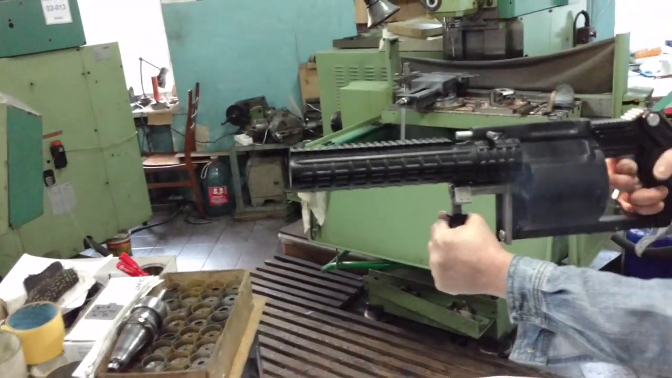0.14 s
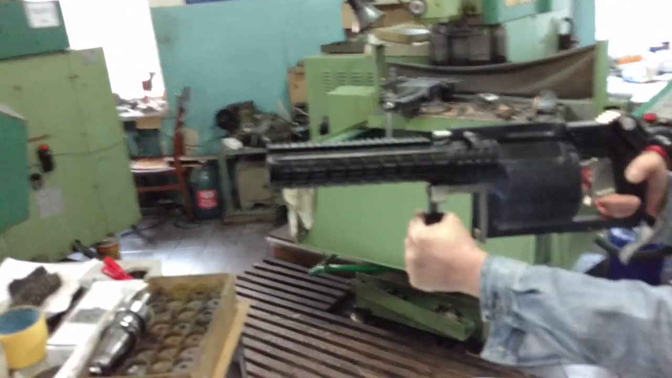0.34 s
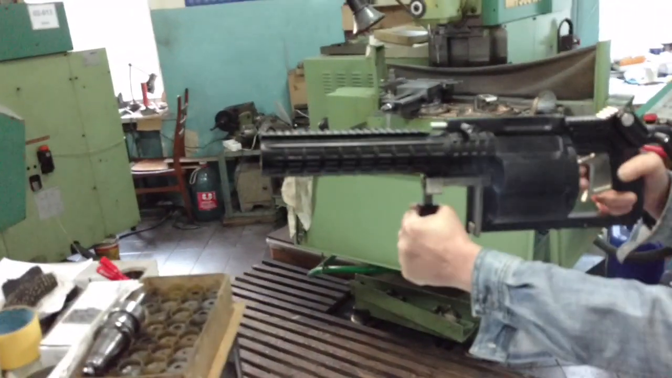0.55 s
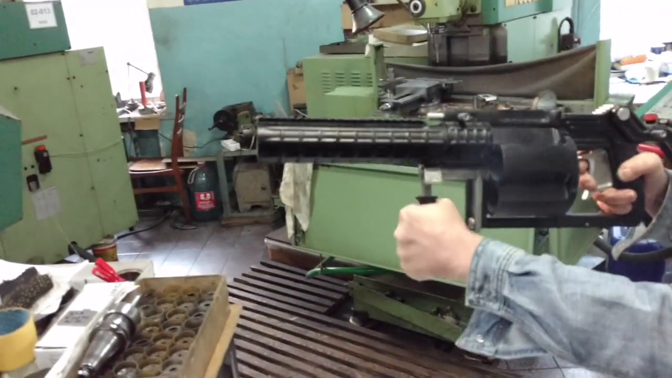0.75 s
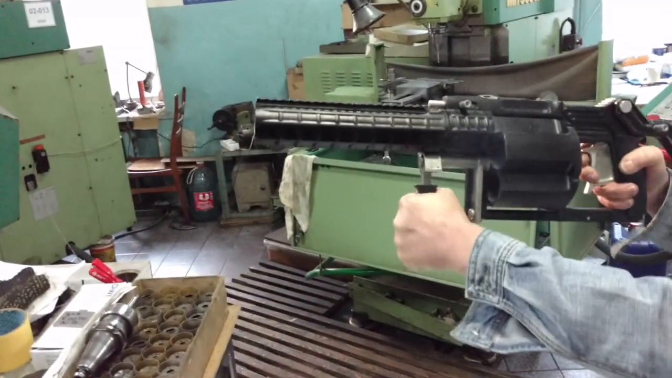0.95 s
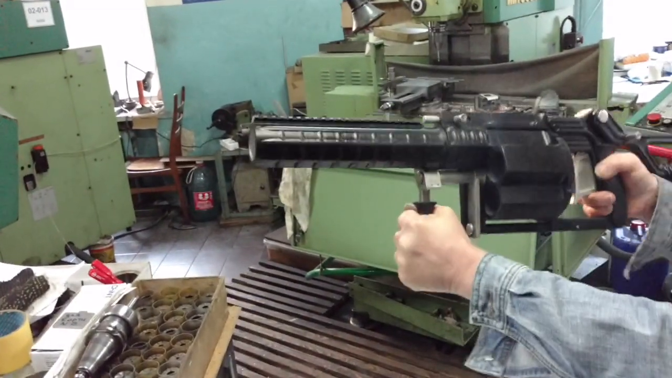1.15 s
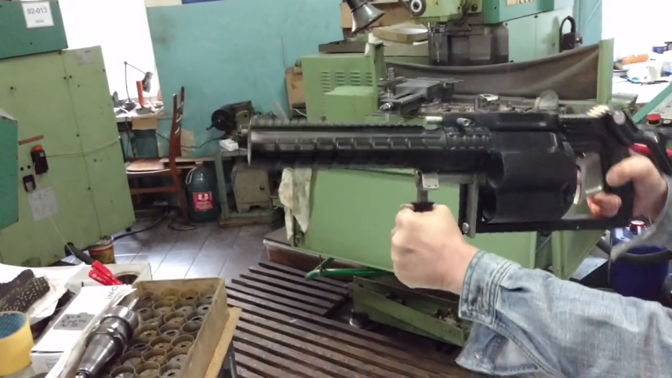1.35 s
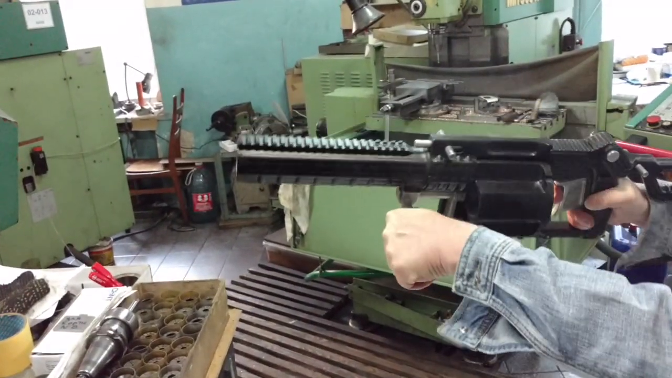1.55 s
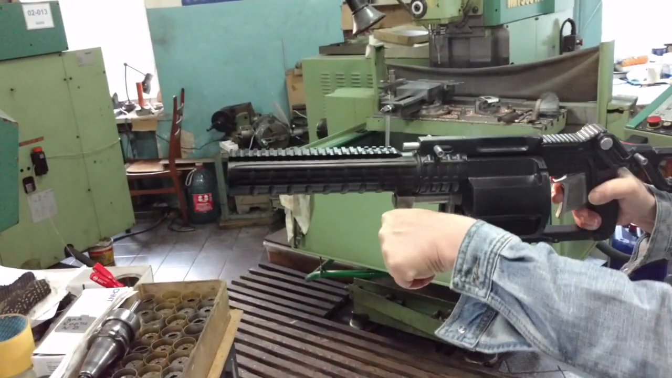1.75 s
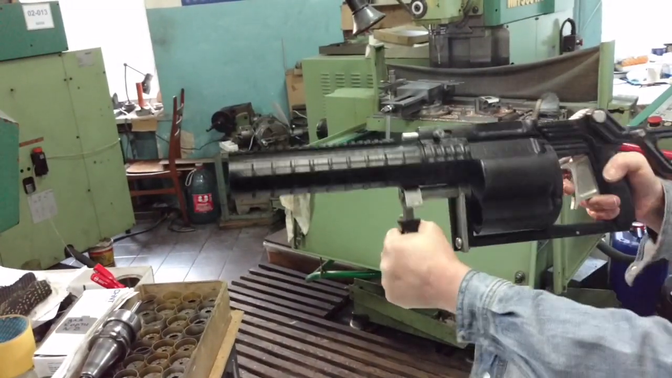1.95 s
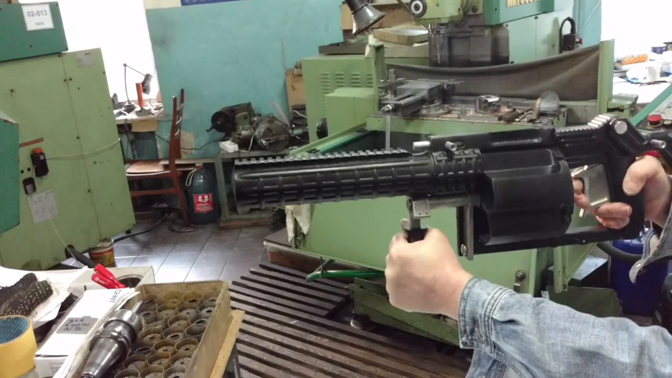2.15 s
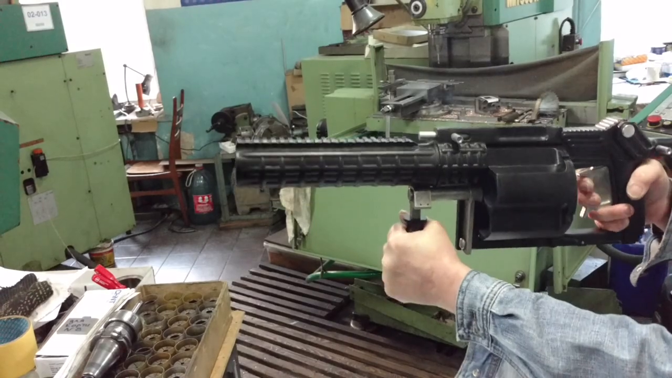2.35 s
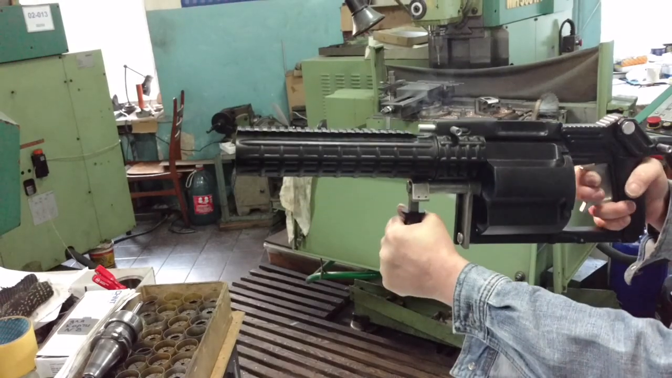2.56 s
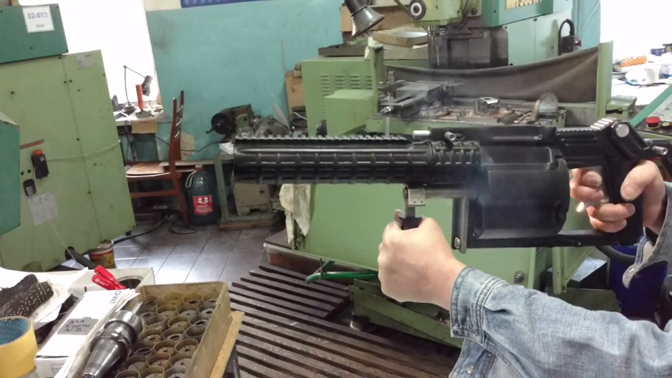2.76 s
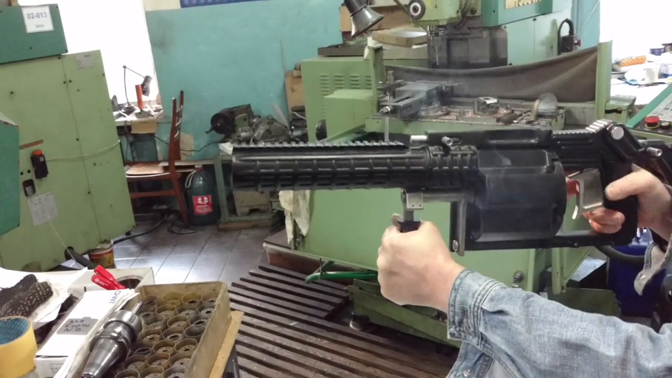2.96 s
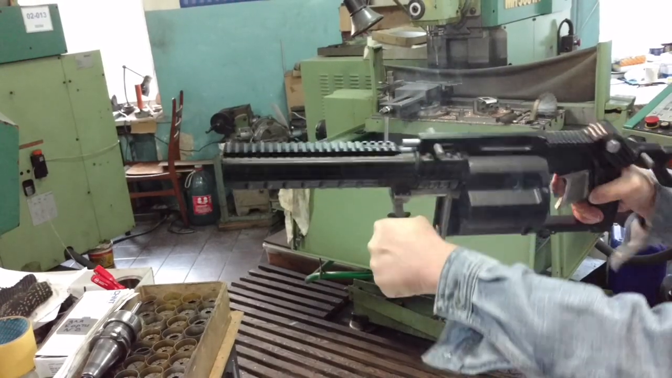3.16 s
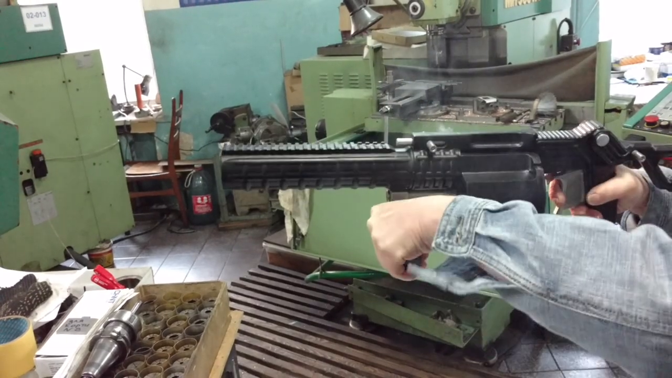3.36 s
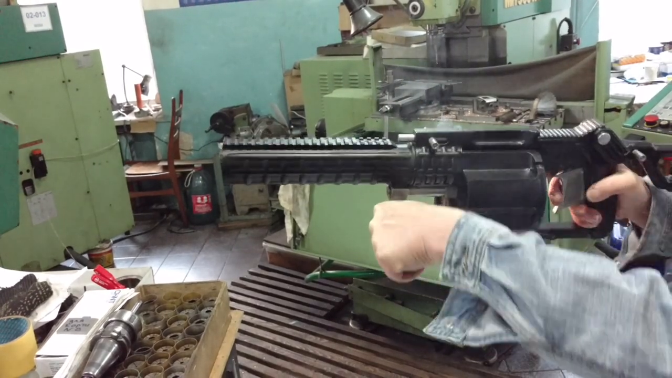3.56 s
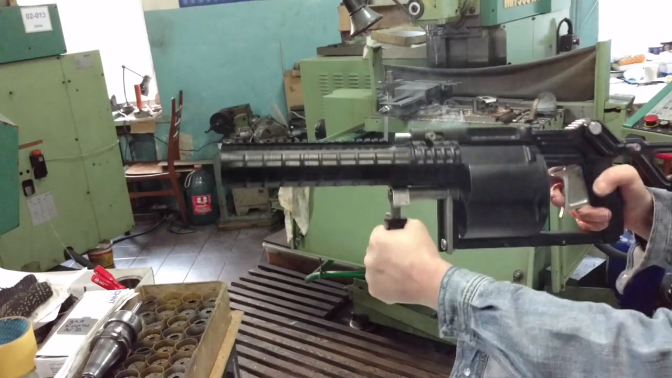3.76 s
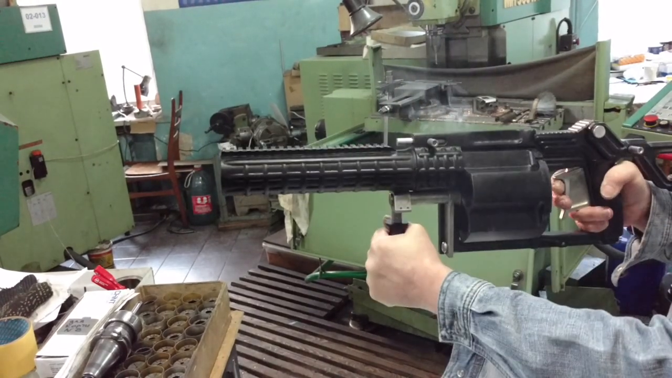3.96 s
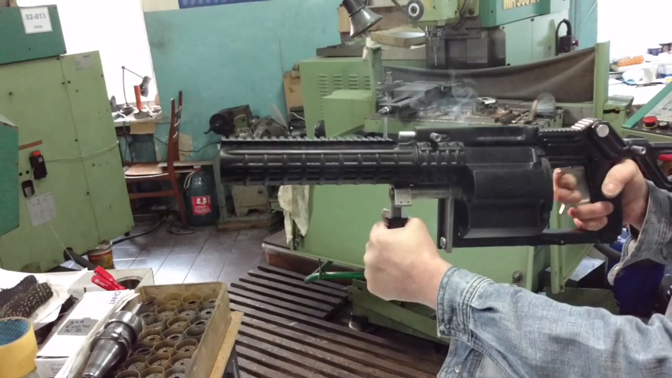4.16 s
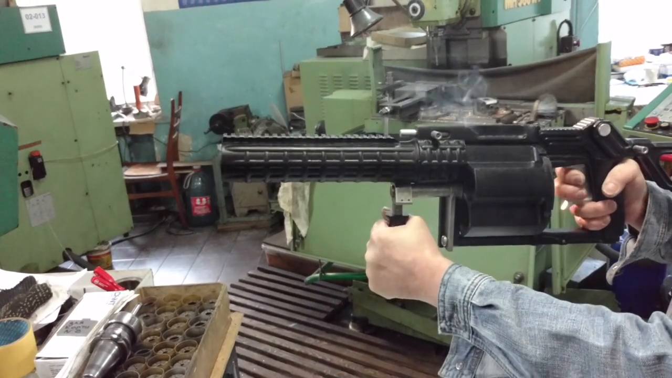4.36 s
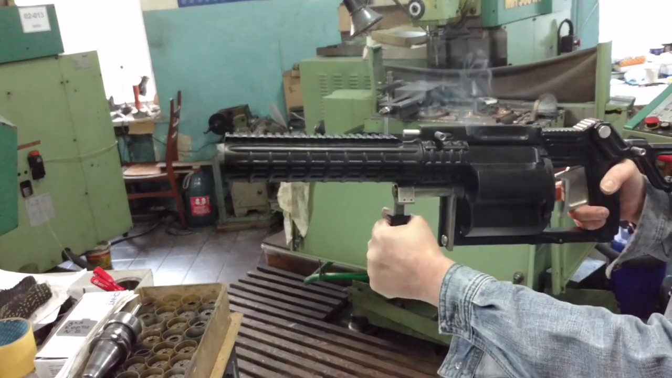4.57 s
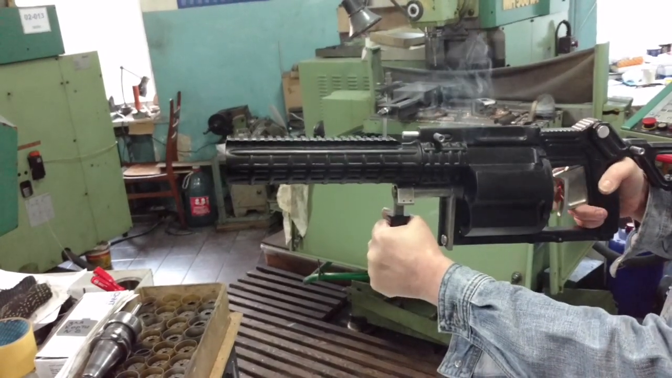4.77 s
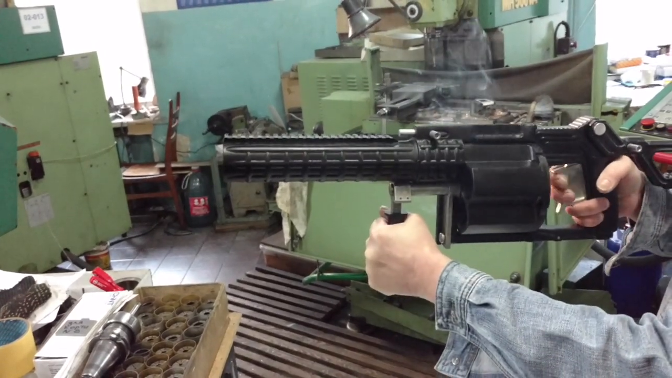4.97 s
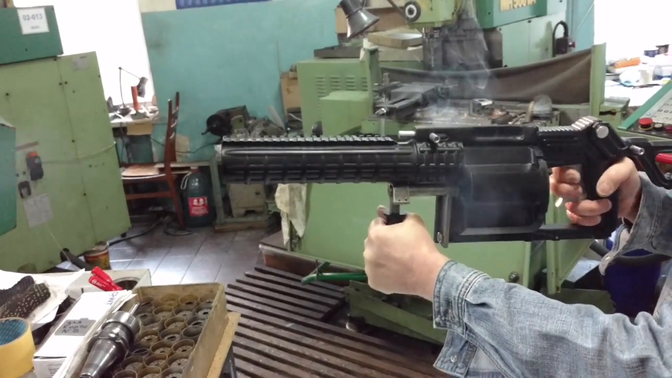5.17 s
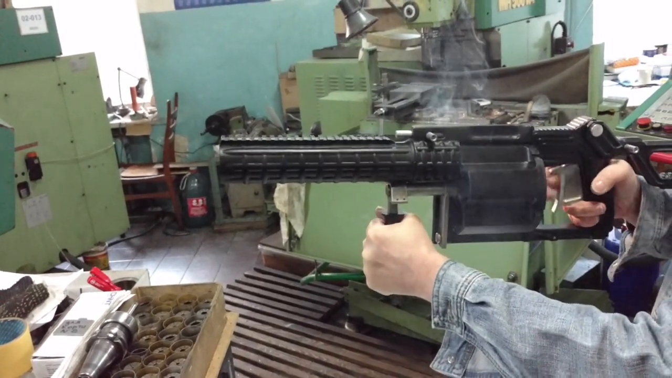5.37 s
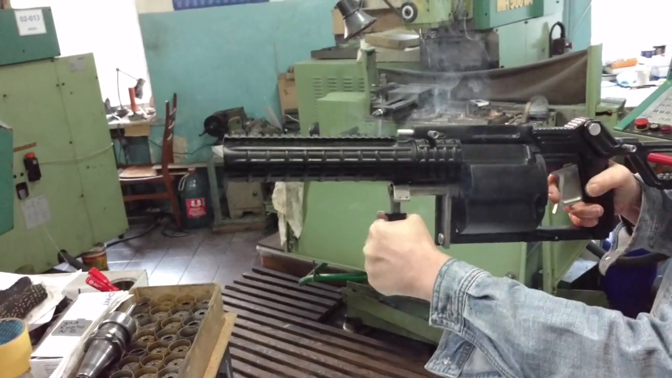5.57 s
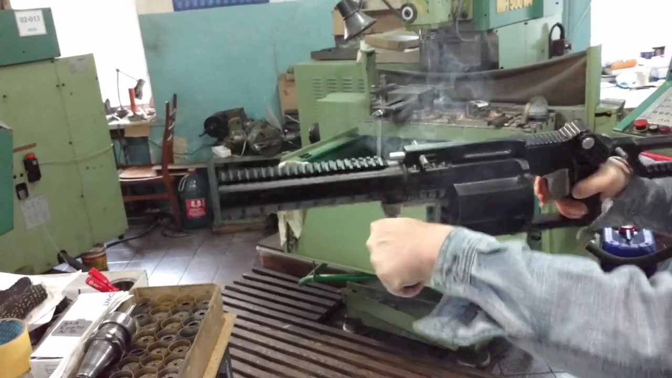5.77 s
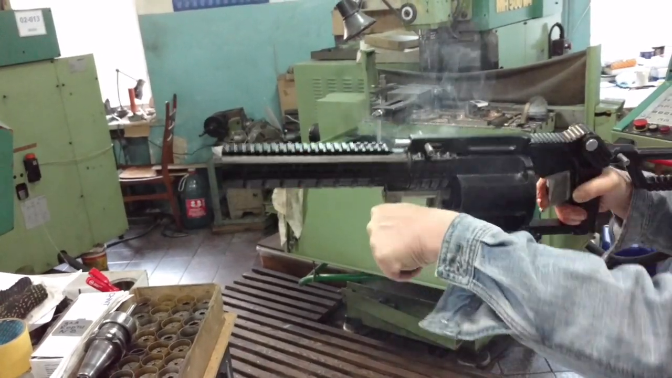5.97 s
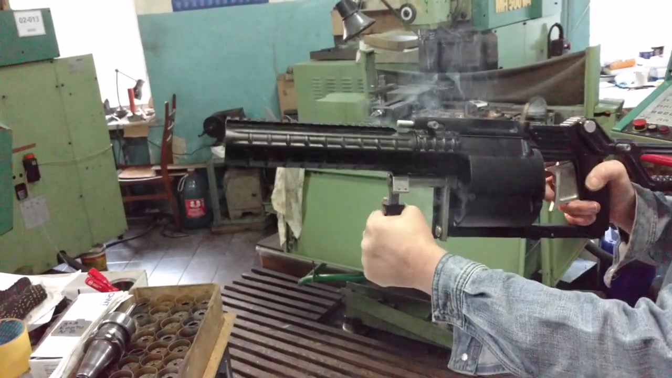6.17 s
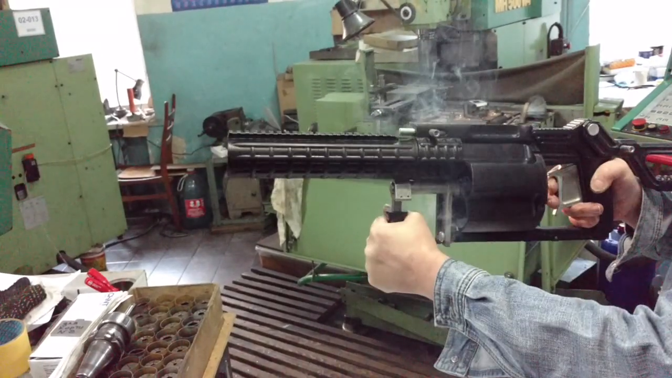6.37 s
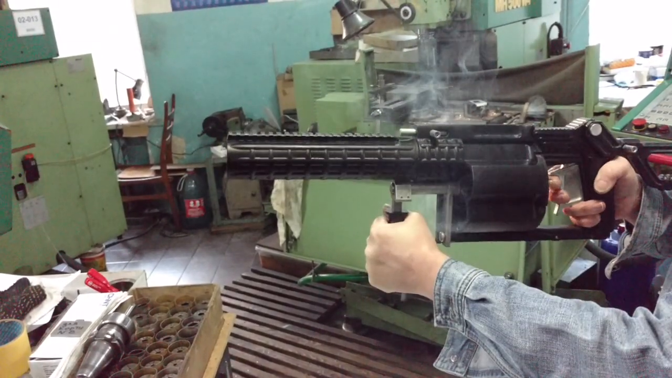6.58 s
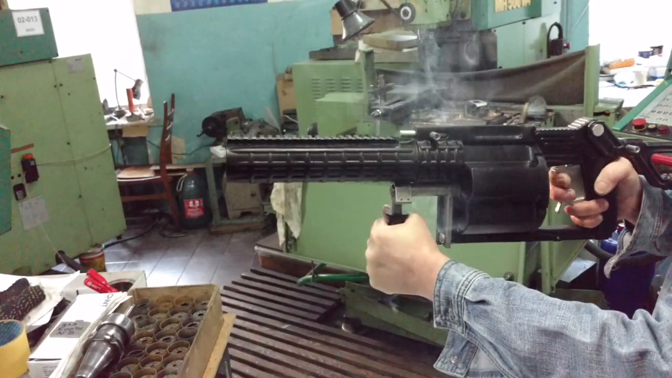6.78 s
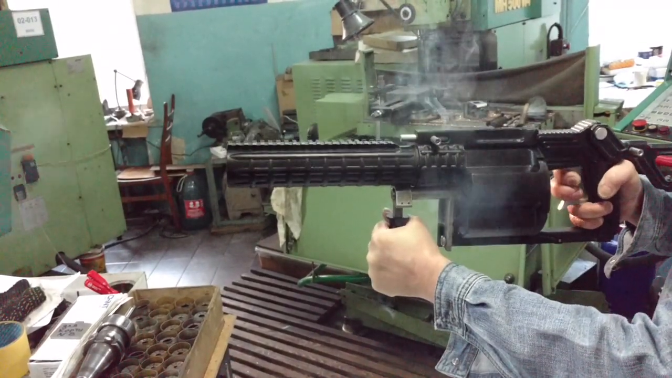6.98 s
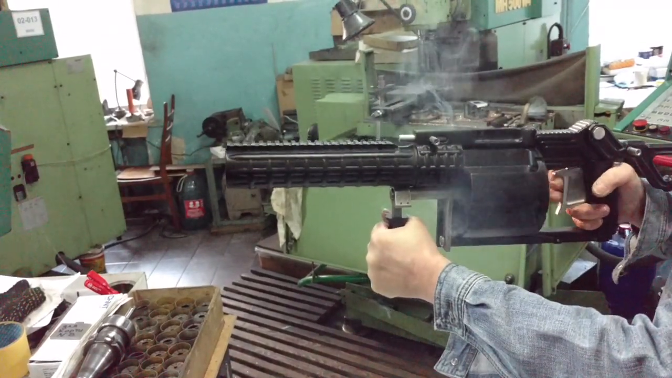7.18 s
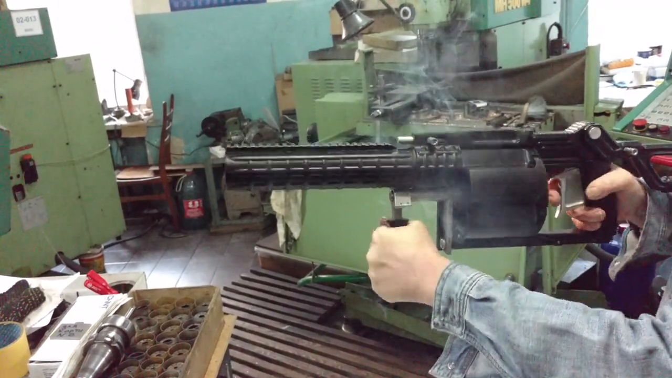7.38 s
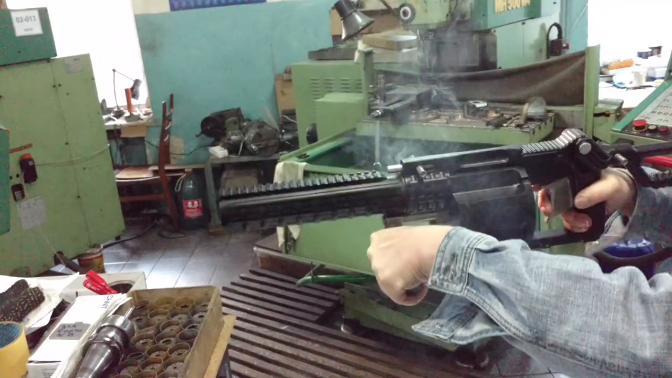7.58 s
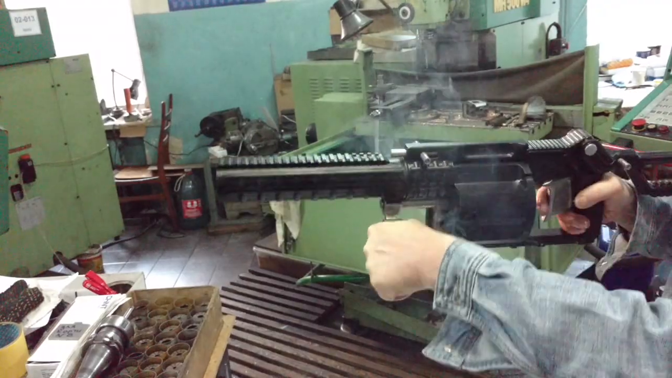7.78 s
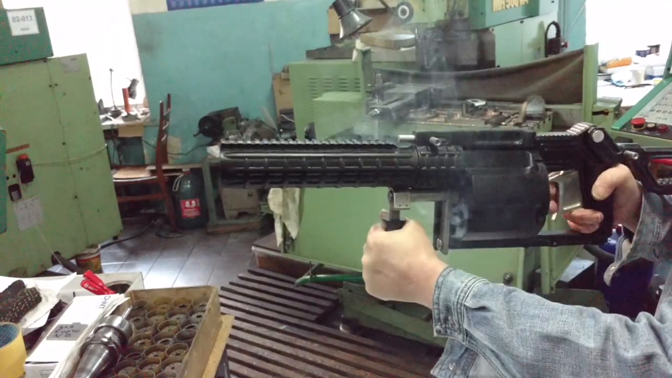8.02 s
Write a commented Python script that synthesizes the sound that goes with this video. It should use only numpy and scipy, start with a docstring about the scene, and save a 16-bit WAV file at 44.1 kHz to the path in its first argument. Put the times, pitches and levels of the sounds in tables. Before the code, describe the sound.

Close to the microphone in a hard-walled workshop, a hand-held revolving launcher fires four times. Each overloaded bang has a tiny crack just before it, a low push and a ringing tail under a second long. Between shots the cylinder and trigger click and clack sharply. An airy machine drone, hum and thin electric whine duck after each blast, then swell back.

```python
"""Revolver launcher in a machine shop

Four shots close to a camera: each a small crack, 4 ms later the blast, a low push, then the ringing hard room.
Cylinder and trigger click and clack as noise bursts and dying modes, over a noise drone, hum and electric whine.
The camera's gain control ducks at every blast and creeps back, so the shop seems to swell toward the next shot;
the blasts overload its input.
"""
import sys
import numpy as np
from scipy import signal
from scipy.fft import rfft, irfft
from scipy.io import wavfile
from scipy.ndimage import minimum_filter1d

SR = 44100
rng = np.random.default_rng(int(sys.argv[2]) if len(sys.argv) > 2 else 0)


def generate_wav(signal):
    """Clip the signal to [-1, 1] and save it as 16-bit WAV at the path in sys.argv[1]."""
    frames = np.transpose(np.atleast_2d(signal))
    scaled = np.clip(frames, -1, 1) * 32767
    pcm = np.round(scaled).astype(np.int16)
    wavfile.write(sys.argv[1], SR, pcm)


N = 355005
TIME = np.arange(N) / SR  # s


def amp(db):
    """Amplitude factor of a level in dB."""
    return 10 ** (np.asarray(db) / 20)


def evened(x):
    """Scales x to rms 1."""
    return x / np.sqrt(np.mean(x ** 2) + 1e-20)


def brief(x, seconds):
    """Scales x to the energy of a sound of rms 1 lasting the given time."""
    energy = np.mean(x ** 2) * x.shape[-1]
    return x * np.sqrt(seconds * SR / (energy + 1e-20))


def over_time(points):
    """Linear curve through (time, value) points, over the whole scene."""
    return np.interp(TIME, *np.transpose(points))


def read(points, hz):
    """Curve through (frequency, value) points, linear in log frequency."""
    f, value = np.transpose(points)
    return np.interp(np.log(hz + 1), np.log(f + 1), value)


def add(mix, start_s, sound):
    """Adds a sound into the mix in place, cut at the end of the mix."""
    part = mix[:, round(start_s * SR):][:, :sound.shape[-1]]
    part += sound[..., :part.shape[1]]


# likeness of left and right noise: (frequency [Hz], coherence [0-1])
LIKENESS = [(100, 0.96), (900, 0.98), (3000, 1), (8000, 0.97), (15000, 0.59)]


def noise(count):
    """White noise on two channels, nearly alike in the bass and less so in the treble."""
    left, other = rfft(rng.standard_normal((2, count)))
    same = np.clip(read(LIKENESS, np.fft.rfftfreq(count, 1 / SR)), 0, 1)
    right = same * left + np.sqrt(1 - same ** 2) * other
    return irfft(np.array([left, right]), count)


def coloured(x, spectrum, treble_db=0, size=4096):
    """Causal minimum-phase filter of unit energy; the treble lift acts above about 2 kHz."""
    hz = abs(np.fft.fftfreq(size, 1 / SR))
    log_gain = np.log(amp(read(spectrum, hz) + treble_db * hz / (hz + 2000)))
    response = np.exp(signal.hilbert(log_gain).conj())
    taps = np.fft.ifft(response).real[:size // 2]
    taps = taps / np.linalg.norm(taps)
    return signal.oaconvolve(x, taps[None], axes=1)[:, :x.shape[1]]


def burst(hold_s, fall_s, count=4096):
    """White noise that holds for a moment, then dies away exponentially."""
    t = np.arange(count) / SR
    return noise(count) * np.exp(-np.maximum(t - hold_s, 0) / fall_s)


def rung(modes, scatter):
    """Sum of dying modes, each detuned at random by a relative scatter."""
    t = np.arange(4096) / SR
    out = np.zeros(len(t))
    for hz, db, t60_s in modes:
        detuned_hz = hz * (1 + scatter * rng.standard_normal())
        out += amp(db - 60 * t / t60_s) * np.sin(2 * np.pi * detuned_hz * t)
    return out


def wander(rate_hz, count=2048):
    """Slow complex random signal of rms about 1, changing about rate_hz times a second."""
    white = rng.standard_normal(count) + 1j * rng.standard_normal(count)
    hz = np.fft.fftfreq(count, N / SR / count)
    slow = np.fft.ifft(np.fft.fft(white) * np.exp(-(hz / rate_hz) ** 2))
    return np.interp(TIME, np.linspace(0, N / SR, count), slow / np.std(slow))


# colour of the airy drone: (frequency [Hz], relative density [dB per Hz])
DRONE = [(30, -17), (90, -10), (170, -1.5), (300, -3.5), (400, -0.5), (560, -7.5), (820, -6.5),
         (1500, -10.5), (2500, -17), (3400, -13.5), (5000, -23), (8000, -23), (14000, -29)]
# pitch of the hum: (time [s], frequency [Hz])
HUM = [(0, 401.5), (2, 393), (4.9, 394.1), (5.1, 404), (5.25, 418), (6.4, 392), (8, 391)]


def drone(hiss_db=-2.0, hum_db=-6.5, octave_db=-16, hum_width_hz=10, hum_waver=.45):
    """Coloured noise with a gliding hum and its octave, both wavering at random."""
    turn = np.exp(2j * np.pi * np.cumsum(over_time(HUM)) / SR)
    out = amp(hiss_db) * coloured(noise(N), DRONE)
    for db, tone in [(hum_db, turn), (octave_db, turn ** 2)]:
        wavering = (1 + hum_waver * wander(hum_width_hz)) * tone
        out = out + amp(db) * evened(wavering.real)
    return out


# tones of the electric whine: (frequency [Hz], level relative to its level curve [dB])
WHINE = [(1669, -10.5), (1878, -5.5), (2087, 9.5), (3423, -27), (3962, -23), (6597, -18.5), (7009, -25.5),
         (7353, -24.5), (7429, -16.5), (7474, -21.5), (9173, -23.5), (10348, -22.5), (11272, -26)]


def whine(low_gain, high_gain, flutter=.35, flutter_hz=6, split_hz=3000):
    """Thin steady-pitched electric tones that flutter in level."""
    out = np.zeros(N)
    for hz, db in WHINE:
        gain = low_gain if hz < split_hz else high_gain
        tone = (1 + flutter * wander(flutter_hz).real) * np.cos(2 * np.pi * hz * TIME)
        out += gain * amp(db) * evened(tone)
    return out


# level of the drone, and of the whine from 3 kHz up: (time [s], level [dB])
DRONE_LEVEL = [(0, -42.5), (1.3, -40), (2, -41), (2.25, -47), (2.8, -46), (3.799, -43), (8.001, -41.5)]
# the low tones of the whine come and go: (time [s], level [dB])
WHINE_LEVEL = [(0, -44.5), (1.25, -44), (1.36, -45), (1.45, -43), (1.65, -49), (2, -42.5), (2.3, -52.5),
               (2.8, -56.5), (3.9, -73.5), (4.33, -65.5), (4.48, -52), (4.82, -49), (4.91, -57.5),
               (5.15, -43), (5.3, -46), (6.2, -71.5), (7.1, -59), (8, -69.5)]


def background():
    """Drone and whine; the high tones of the whine follow the drone's level."""
    low_gain, high_gain = amp(over_time(WHINE_LEVEL)), amp(over_time(DRONE_LEVEL))
    return high_gain * drone() + whine(low_gain, high_gain)


# soft bumps of handling: (time [s], level [dB])
BUMPS = [(1.155, -22.5), (3.605, -23.5), (4.691, -45), (4.954, -33)]


def bumps(hz=150, width_s=0.0031):
    """Dull, soft knocks: low tones of a cycle or two in a bell-shaped envelope."""
    out = np.zeros(N)
    for s, db in BUMPS:
        t = TIME - s
        out += amp(db) * np.exp(-.5 * (t / width_s) ** 2) * np.cos(2 * np.pi * hz * t)
    return out


# standing waves of the room: (frequency [Hz], level [dB])
ROOM_MODES = [(224, -32), (344, -27.5), (570, -27.5), (626, -26), (696, -27), (724, -31.5), (791, -24.5),
              (867, -26.5), (1107, -30), (1185, -28), (1257, -29.5), (1360, -33.5), (1458, -28),
              (1638, -24)]
# decay time of the room: (frequency [Hz], T60 [s])
ROOM_T60 = [(60, 0.98), (250, 0.8), (700, 0.77), (2000, 0.83), (3500, 0.76), (5500, 0.73), (8000, 0.61),
            (12000, 0.41), (15000, 0.23)]


def room(early_db=3, early_s=0.058, build_s=0.00037):
    """The workshop's answer to a bang: diffuse sound and standing waves, dying fastest in the treble."""
    t = np.arange(SR) / SR
    field = noise(SR)
    for hz, db in ROOM_MODES:
        field = field + amp(db) * np.sin(2 * np.pi * (hz * t + rng.random()))
    hz, at_s, bins = signal.stft(field, SR, nperseg=256)
    decay = amp(-60 * at_s / read(ROOM_T60, hz)[:, None])
    field = signal.istft(bins * decay, SR, nperseg=256)[1][:, :SR]
    early_lift = amp(early_db * np.exp(-t / early_s))
    return field * early_lift * (1 - np.exp(-t / build_s))


# clicks of cylinder, latch and trigger; hardness gives more tick, less frame ring:
# (time [s], level [dB], hardness [dB])
CLICKS = [(1.2005, -31, -10.5), (1.372, -24, 7.5), (1.587, -30, -11), (1.6108, -25, -3), (1.6515, -7, -2.5),
          (2.047, -27.5, -5), (2.0837, -12, 2), (2.527, -41.5, -7.5), (3.2897, -32, 7), (3.458, -5, 0.5),
          (3.893, -12, 3), (4.3425, -40.5, 6.5), (4.3939, -25, -5), (4.671, -30.5, 5.5), (4.705, -26, 3),
          (5.1512, -33, -5), (5.877, -4, 2.5), (6.2903, -9, 1.5), (6.4376, -24.5, 5.5),
          (6.8064, -36.5, -2.5), (7.627, -5.5, 1), (7.695, -28, -14), (8.0394, -33.5, -1)]
# ringing of the frame: (frequency [Hz], level [dB], T60 [s])
FRAME = [(520, -37, 0.0087), (650, -10.5, 0.031), (729, -22, 0.098), (799, -6, 0.048), (871, -8.5, 0.046),
         (1070, 1, 0.01)]
# ringing of small steel parts: (frequency [Hz], level [dB], T60 [s])
STEEL = [(1245, -28, 0.087), (1513, 13.5, 0.024), (3540, 7.5, 0.025), (3845, 9, 0.022), (5710, 2.5, 0.028),
         (7960, -13, 0.033)]
# colours of the frame as the room returns it, of clack and of tick:
# (frequency [Hz], relative density [dB per Hz])
KNOCK = [(250, -18.5), (600, -2.5), (820, 1.5), (1100, -7.5), (2500, -27.5)]
CLACK = [(250, -24), (700, -6), (1150, -1), (1450, -2.5), (1900, 2.5), (2400, -14), (3500, -2.5),
         (4600, -3), (5500, -1), (6600, -10.5), (9000, -33)]
TICK = [(4500, -20.5), (6800, 1), (7900, -4), (10000, -8), (15000, -7.5)]


def clicks(answer, knock_wet_db=-8.0, clack_wet_db=-7.5, tick_wet_db=-11, rise_s=0.0026, chatter_db=-2.5,
           steel_db=-3.0, ring_db=-2, tick_db=-5, rebound_s=.018, rebound_db=-10, level_s=.003):
    """Parts chatter and ring as they seat; soft blows ring the frame, hard ones tick; a rebound follows."""
    out, t = np.zeros((2, N)), np.arange(4096) / SR
    rise = 1 - np.exp(-t / rise_s)
    wet = [(knock_wet_db, KNOCK), (clack_wet_db, CLACK), (tick_wet_db, TICK)]
    tails = [amp(db) * brief(coloured(answer, colour), level_s) for db, colour in wet]
    for s, level_db, hard_db in CLICKS:
        ring = brief(rung(FRAME, scatter=0.018) * rise, level_s)
        rebound = brief(rung(FRAME, scatter=0.018) * rise, level_s)
        chatter = brief(coloured(burst(0.0014, 0.0028), CLACK), level_s)
        steel = brief(rung(STEEL, scatter=0.025), level_s)
        clack = amp(chatter_db) * chatter + amp(steel_db) * steel
        tick = brief(coloured(burst(0.0003, 0.0025), TICK), level_s)
        frame_db = level_db + ring_db - hard_db
        part_db = [frame_db, level_db, level_db + tick_db + hard_db]
        for db, part, tail in zip(part_db, [ring, clack, tick], tails):
            add(out, s, amp(db) * part)
            add(out, s, amp(db) * tail)
        add(out, s + rebound_s, amp(frame_db + rebound_db) * rebound)
    return out


def push(push_hz=80, swell_s=0.006, thump_hz=208, thump_s=0.0086, thump_width_s=0.0055):
    """The gas of each shot shoves the air and the barrel thumps: a few low cycles under the bang."""
    out, t = np.zeros((2, N)), np.arange(SR // 2) / SR
    shove = t / swell_s * np.exp(1 - t / swell_s) * np.sin(2 * np.pi * push_hz * t)
    thump = np.exp(-.5 * ((t - thump_s) / thump_width_s) ** 2) * np.sin(2 * np.pi * thump_hz * t)
    for s, *_, push_db, thump_db in SHOTS:
        add(out, s, amp(push_db) * shove + amp(thump_db) * thump)
    return out


# shots, the last two columns for push(): (time [s], crack [dB], blast [dB], room [dB],
# room treble lift [dB], low push [dB], barrel thump [dB])
SHOTS = [(0.2245, -10.5, 29, 13, 3.5, 4, 16), (2.813, -15.5, 27, 16, 1, 8.5, 8),
         (5.305, -9, 28, 16.5, -1, 6, 3), (7.1195, -9.5, 27, 16.5, 1, 7, -0.5)]
# colours of crack, blast and the blast as the room returns it:
# (frequency [Hz], relative density [dB per Hz])
CRACK = [(100, -18.5), (700, -3.5), (2500, -6.5), (7000, -5.5), (15000, -21.5)]
BLAST = [(25, -12.5), (100, -8.5), (300, -4.5), (800, -1), (2000, -3.5), (5000, -7.5), (9000, -10),
         (15000, -18)]
BOOM = [(30, -30), (75, -19), (115, -11), (165, -10), (230, -1), (420, -5), (580, -3), (780, 1.5),
        (980, -5.5), (1400, -5), (2400, -10.5), (3200, -13), (7500, -22.5), (14500, -32)]
# echoes from machines and walls: (delay [s], level over the diffuse sound [dB])
ECHOES = [(.0104, 1), (.0263, -4.5), (.0301, -3), (.0368, 4.5), (.0589, 5.5), (.0706, -4.5), (.0741, 0.5),
          (.0853, 0), (.0928, -8), (0.1186, 6.5), (0.1391, 5)]


def shots(answer, lead_s=.0039, echo_width_s=0.00032):
    """A small crack as the charge lights, the blast just after it, then the room with its echoes."""
    out, t = np.zeros((2, N)), np.arange(SR) / SR
    echo_db = sum(db * np.exp(-.5 * ((t - s) / echo_width_s) ** 2) for s, db in ECHOES)
    echoing = answer * amp(echo_db)
    for s, crack_db, blast_db, room_db, treble_db, *_ in SHOTS:
        crack = brief(coloured(burst(0.00077, 0.0017), CRACK), .0035)
        blast = brief(coloured(burst(.0011, 0.00055), BLAST), .0021)
        add(out, s - lead_s, amp(crack_db) * crack)
        add(out, s, amp(blast_db) * blast)
        add(out, s, amp(room_db) * coloured(echoing, BOOM, treble_db))
    return out


def scene():
    """All layers, with one room answer shared by clicks and shots."""
    answer = room()
    return background() + bumps() + clicks(answer) + push() + shots(answer)


def gain_control(x, limit_db=-3, sense_s=0.0069, ahead_s=.0007, hold_s=0.61, recover_db_per_s=11):
    """Turns down at once by as much as the power exceeds the limit, holds, then recovers at a steady rate."""
    keep, reach = np.exp(-1 / (sense_s * SR)), round(hold_s * SR / 2)
    power = signal.lfilter([1 - keep], [1, -keep], np.mean(x ** 2, 0))
    wanted_db = np.minimum(limit_db - 10 * np.log10(power + 1e-12), 0)
    # the shifted window looks back only
    held_db = minimum_filter1d(wanted_db, 2 * reach + 1, origin=reach, mode="nearest")
    climb_db = recover_db_per_s * TIME
    gain_db = np.minimum.accumulate(held_db - climb_db) + climb_db
    return x * amp(np.interp(TIME + ahead_s, TIME, gain_db))


def record(dry, balance_db=1.0, ceiling=0.83, hiss_db=-78, right_lag_samples=20, edge_hz=15600):
    """Gain control, faint hiss, a late, inverted, weaker right channel, soft overload, then the band limit."""
    left, right = gain_control(dry) + amp(hiss_db) * noise(N)
    late = np.pad(right, (right_lag_samples, 0))[:N]
    pair = np.array([left * amp(balance_db), -late * amp(-balance_db)])
    clipped = pair / (1 + (pair / ceiling) ** 8) ** (1 / 8)
    lowpass = signal.firwin(255, edge_hz, window=("kaiser", 8), fs=SR)
    return signal.oaconvolve(clipped, lowpass[None], "same")


dry = scene()
out = record(dry)
generate_wav(out)
```